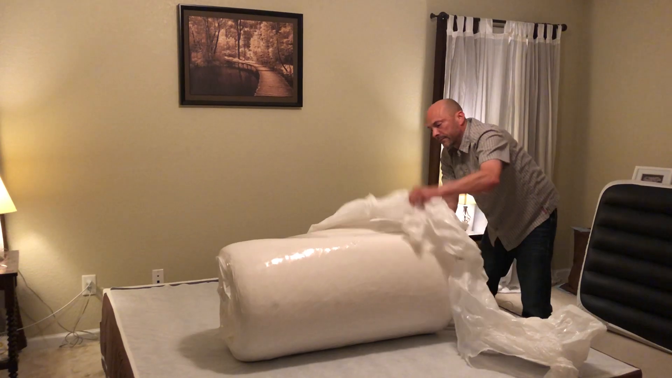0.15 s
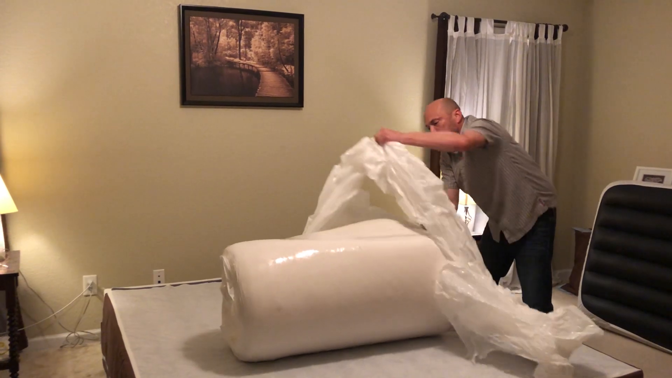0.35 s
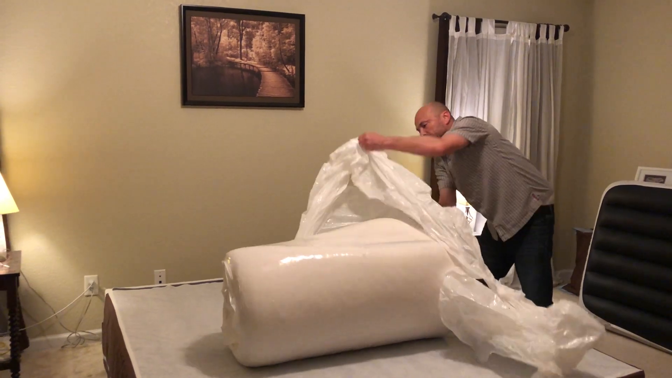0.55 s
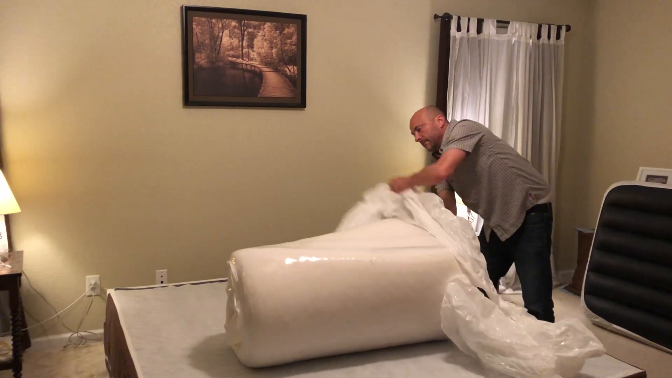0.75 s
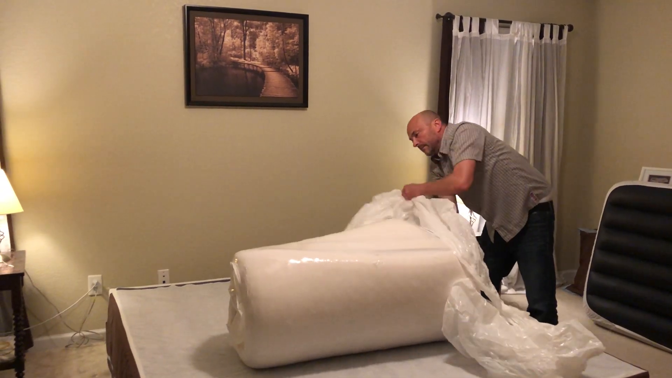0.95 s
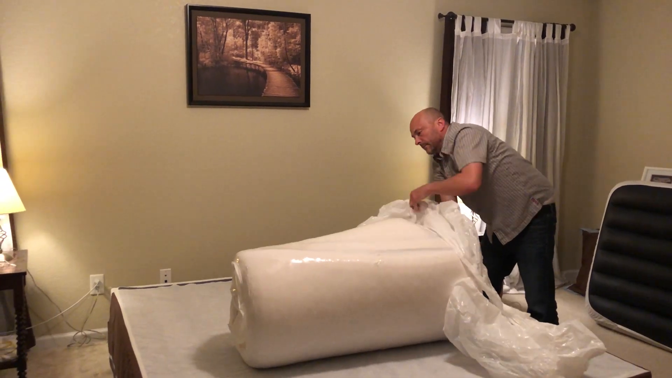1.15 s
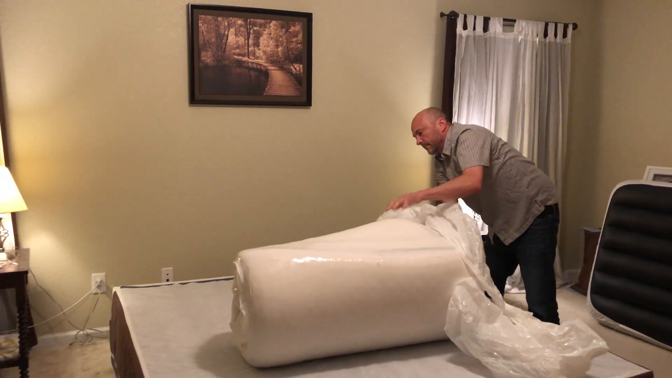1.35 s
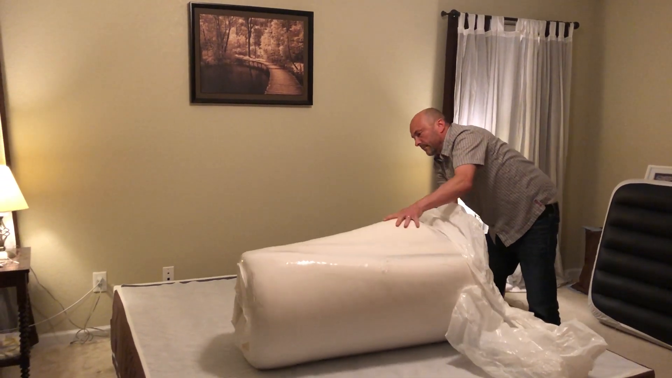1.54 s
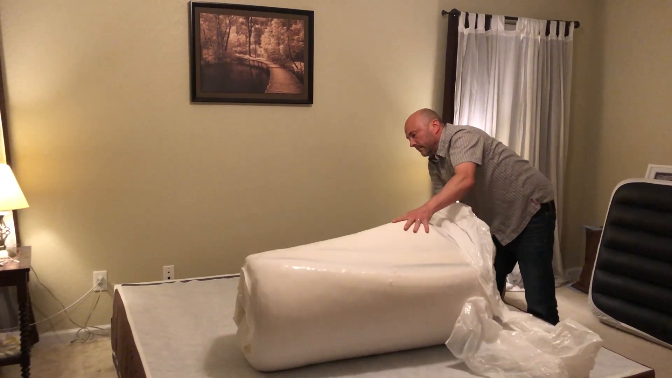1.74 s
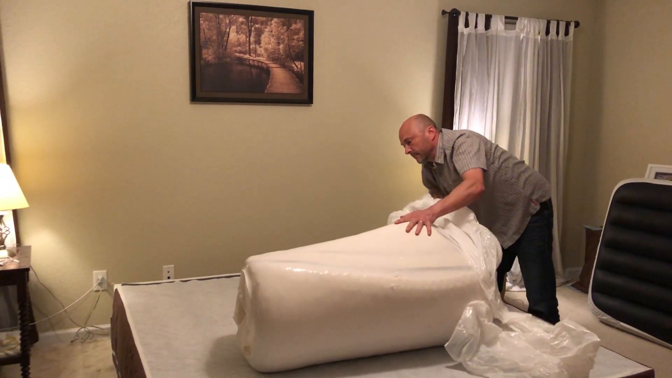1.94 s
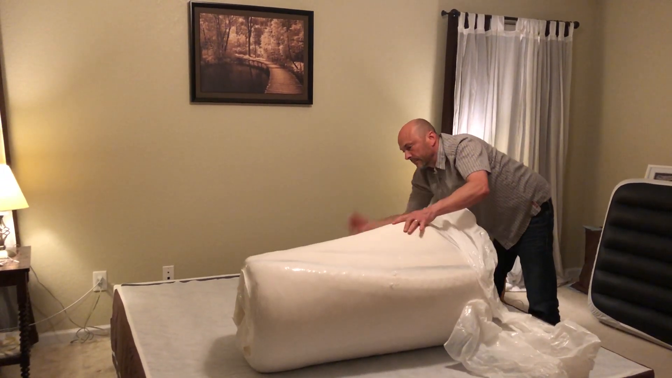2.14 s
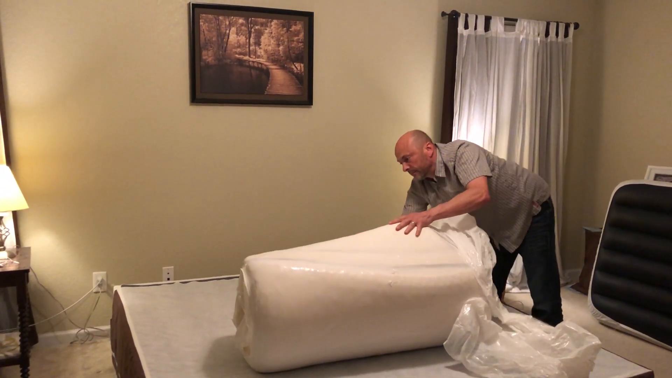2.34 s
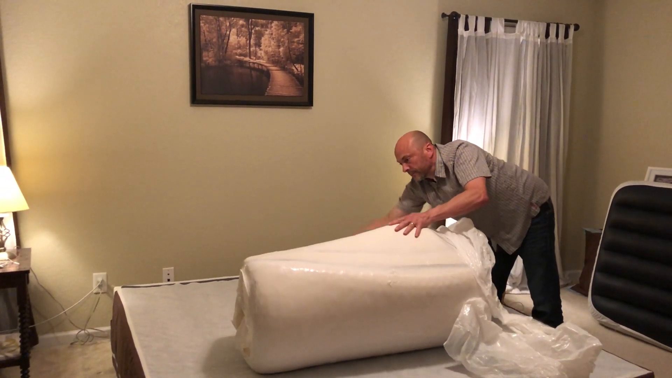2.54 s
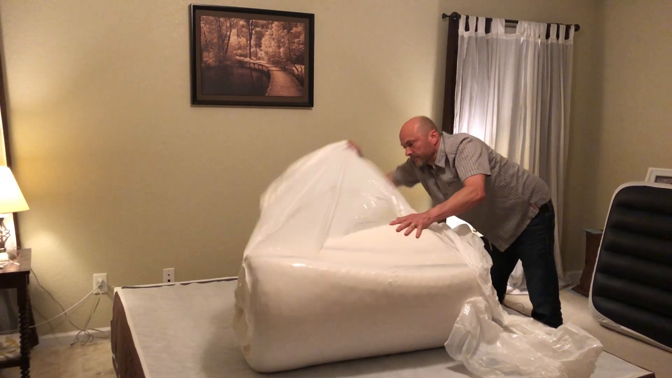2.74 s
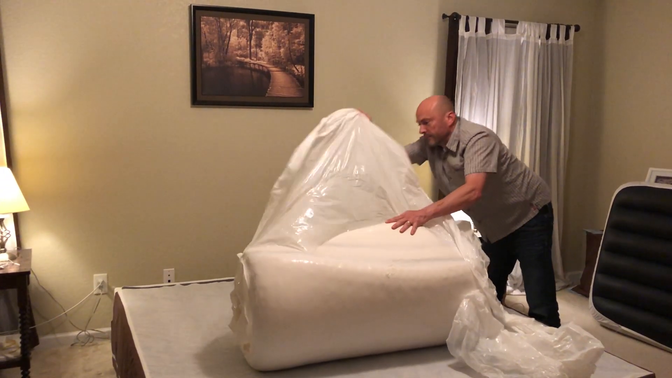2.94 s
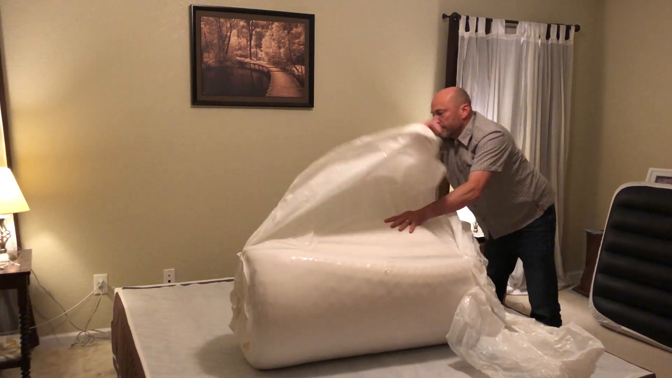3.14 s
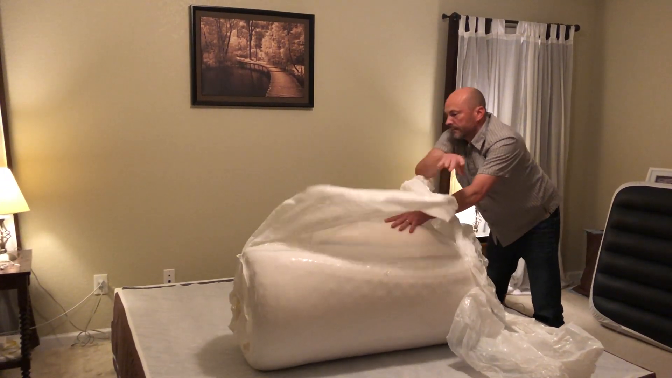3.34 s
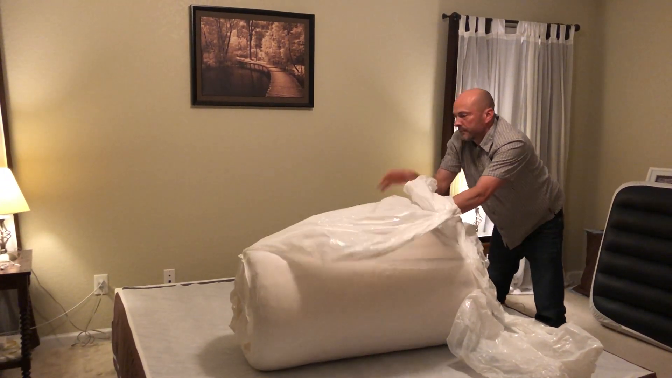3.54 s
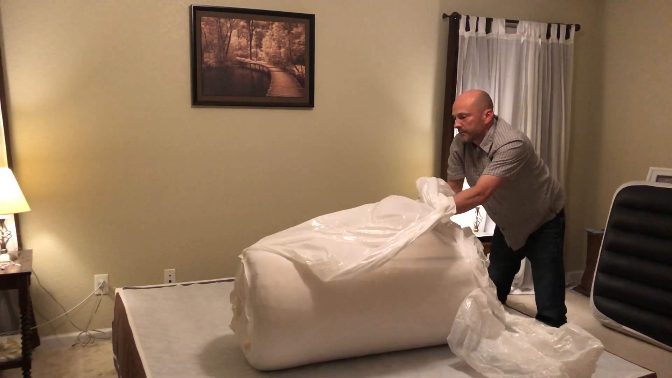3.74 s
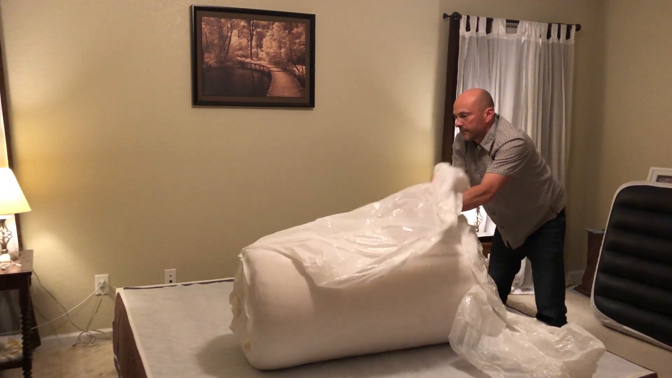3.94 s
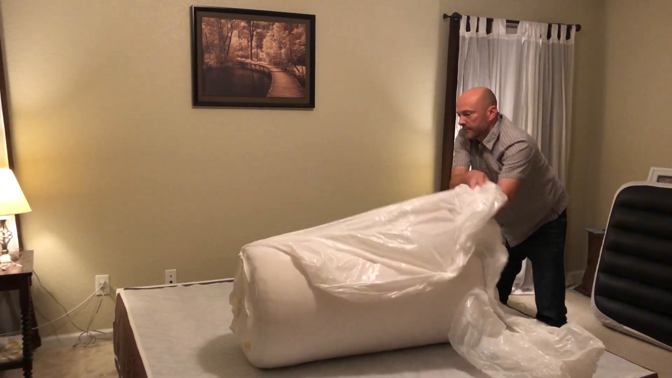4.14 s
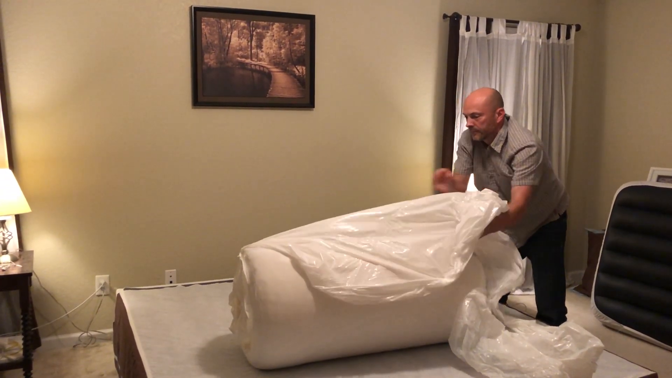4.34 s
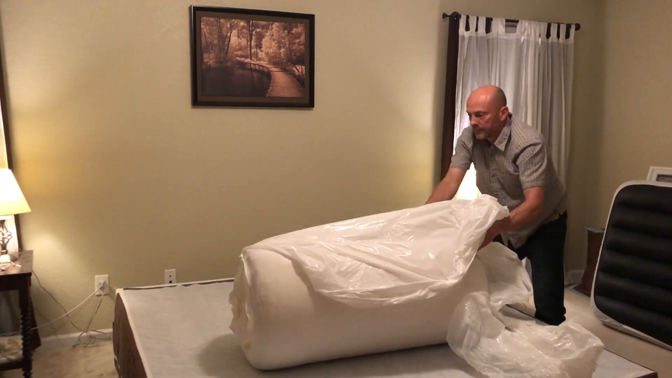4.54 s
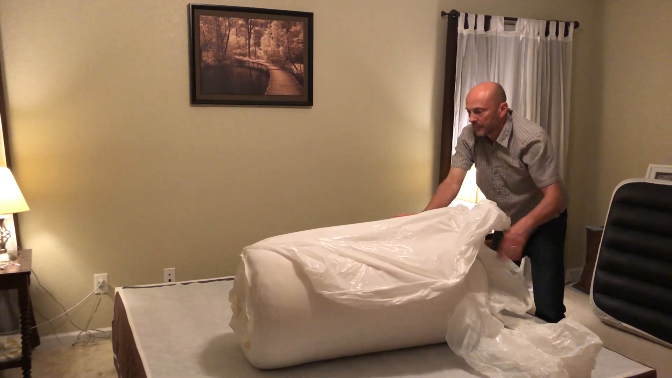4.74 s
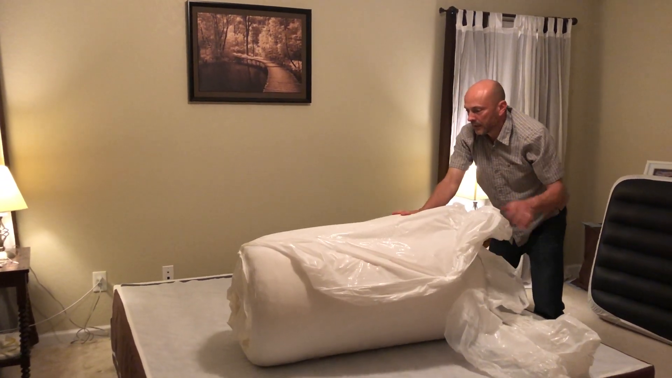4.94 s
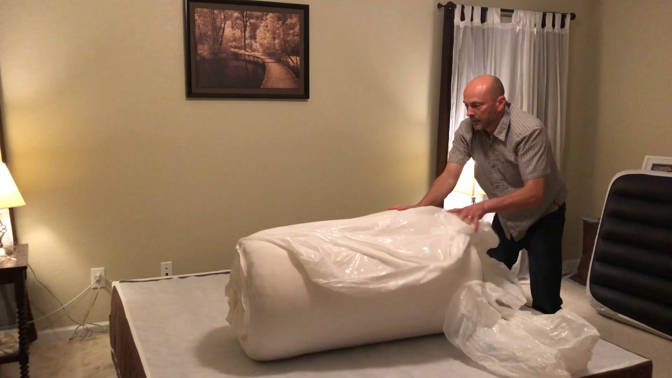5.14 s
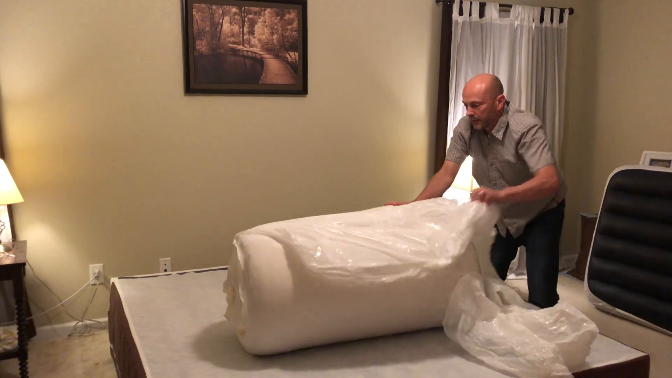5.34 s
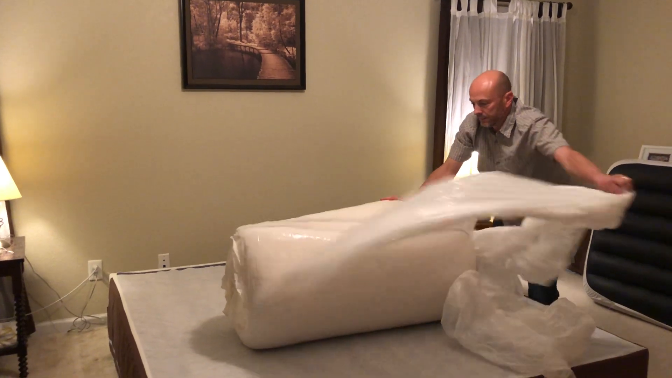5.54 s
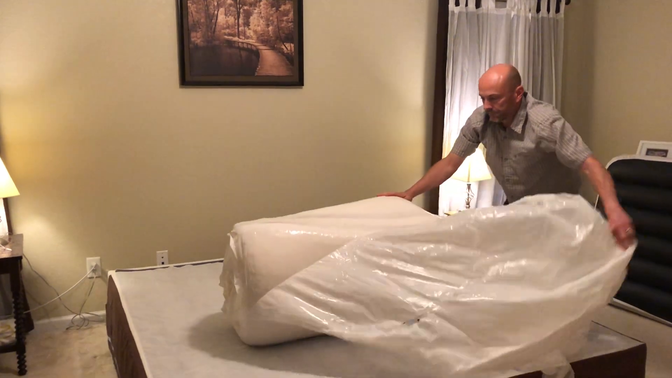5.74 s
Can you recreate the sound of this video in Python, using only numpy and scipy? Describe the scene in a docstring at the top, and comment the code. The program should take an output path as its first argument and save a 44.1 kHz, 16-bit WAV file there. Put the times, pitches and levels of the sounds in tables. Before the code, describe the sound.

A large sheet of thin plastic is pulled off a rolled mattress in a carpeted bedroom, heard by a mono phone a few metres away. Crisp, irregular crinkling starts at once, swelling around 0.3 s and again in tugs from 0.55 to 1.0 s with sharp snaps. From 1.2 to 2.5 s it drops to faint rustles and scattered dry ticks. A strong burst bursts out at 2.65 s, peaking at 2.8 s as the loudest, fullest crumple with a low thump of air, followed by hard snaps near 3.0 to 3.1 s. Small ticks continue to 3.9 s, then medium rustling from 4.0 to 4.3 s. A tiny rising rubbery squeak sounds at about 4.4 s. A duller fold follows at 4.7 s, then near-quiet, light rustle at 5.35 s and a sudden loud crackling sweep at 5.6 s, dying quickly. Faint throbbing hum and airy hiss lie underneath, with a short room tail.

```python
"""A carpeted bedroom: thin plastic sheeting is tugged off a rolled mattress a few metres from a mono phone.
Tugs drive clustered random pops, filtered into third octaves and pitched by crease size.
Lone creases snap as noise ticks over duller bodies; short resonant noise bursts are flaps and crumples.
A palm squeaks once on the film, as three partials of a rising slip rate.
The room adds a short noise tail, a throbbing hum and faint air noise."""
import sys
import numpy as np
from scipy import signal
from scipy.io import wavfile
from scipy.ndimage import uniform_filter1d

SR = 44100
rng = np.random.default_rng(int(sys.argv[2]) if len(sys.argv) > 2 else 0)


def master(y):
    """Save y as 16-bit WAV."""
    cut = np.clip(np.atleast_2d(y).T, -1, 1)
    pcm = np.round(cut * 32767)  # scale
    wavfile.write(sys.argv[1], SR, pcm.astype(np.int16))


N = 254891
TIME_S = np.arange(N) / SR
SLOW_S = np.arange(0, N + 32, 32) / SR  # coarse clock for levels


def undb(db):
    """dB to amplitude."""
    return 10 ** (np.asarray(db) / 20)


def unit(x):
    """Scale to rms 1."""
    return x / np.sqrt(np.mean(x ** 2))


def band(x, lo_hz, hi_hz, order=2):
    """Causal band-pass."""
    edges_hz = [lo_hz, min(hi_hz, .49 * SR)]
    return signal.sosfilt(signal.butter(order, edges_hz, "band", fs=SR, output="sos"), x)


def walk(rate_hz):
    """Random levels held 1 / rate_hz, smoothed twice, on the coarse clock; rms 1."""
    hold = max(int(1 / rate_hz / SLOW_S[1]), 1)
    steps = np.repeat(rng.standard_normal(len(SLOW_S)), hold)[:len(SLOW_S)]
    return unit(uniform_filter1d(uniform_filter1d(steps, hold), hold))


def to_audio(slow):
    """Coarse clock to sample rate."""
    return np.interp(TIME_S, SLOW_S, slow)


def on_log(hz, table):
    """Read a spectrum on a log-frequency axis."""
    table_hz, db = np.transpose(table)
    return np.interp(np.log(hz), np.log(table_hz), db)


def pops(per_s, spread_db):
    """Random buckling impulses of either sign, a few much larger than the rest; rms 1."""
    count = int(per_s * N / SR)
    when, sign, size = rng.random((count, 3)).T
    impulses = np.sign(sign - .5) * undb(-spread_db * np.log(1 - size))
    return unit(np.bincount((when * N).astype(int), impulses, N))


# Pitch per crease size, biggest folds to finest creases: (pitch [Hz])
CREASE_HZ = [200, 700, 1900, 5700, 12500]
# Colour of the crackle: (frequency [Hz], relative third-octave level [dB])
FILM_DB = [(30, -35), (60, -17), (160, -4), (290, 2.5), (520, -2), (1000, 2), (2200, 2), (2900, 0.5),
           (4200, 3), (8000, 4), (11000, 2.5), (15500, 0)]


def crackle():
    """Film buckling: each third octave mixes its own pops, shared broad pops and sparse bright ticks."""
    sizes_db = tugs()
    avalanche_db = 0.58 * walk(35) + 0.83 * walk(120)  # shared by all bands
    broad, bright, out = pops(3000, 3.2), pops(900, 2.2), 0
    for hz in 31 * 2 ** (np.arange(28) / 3):
        place = np.interp(np.log(hz), np.log(CREASE_HZ), np.arange(5))
        k = min(int(place), 3)
        pull_db = sizes_db[k] + (place - k) * (sizes_db[k + 1] - sizes_db[k])
        own = pops(min(.8 * hz, 6000), 1.99)  # small creases pop more often
        mix = own + 0.8 * broad + 0.74 * min(hz / 9000, 1) * bright
        grains = unit(band(mix, hz * 2 ** (-1 / 6), hz * 2 ** (1 / 6)))
        level_db = pull_db + on_log(hz, FILM_DB) + avalanche_db + 0.9 * walk(14)
        out = out + grains * to_audio(undb(level_db))
    return undb(-6.5) * out


# Each tug swells, holds and dies away: (start of hold [s], relative level [dB], swell [dB/s], hold [s],
# fade before FADE_SHARE [dB/s], fold extra before FOLD_SHARE [dB], small-crease extra before SMALL_SHARE [dB])
TUGS = [(.005, -48.5, 100, .03, 103, 7, -2.5), (0.056, -38.5, 600, .03, 80, 2.5, -2.5),
        (0.11, -39.5, 196, 0.045, 60, 2.5, -1), (0.311, -32.5, 165, .07, 106, -4, -1),
        (0.565, -38.5, 56, 0.021, 100, -0.5, 1.5), (0.687, -36, 62, 0.064, 102, -5.5, 3),
        (0.907, -34, 75, 0.02, 187, -2.5, -1), (1.02, -45.5, 100, 0.037, 40, -1.5, -1.5),
        (1.21, -45, 68, 0.12, 154, -0.5, 0.5), (1.51, -49.5, 78, 0.041, 40, 1, 0.5),
        (1.63, -50.5, 80, 0.037, 83, -2.5, -2.5), (1.71, -44.5, 300, 0.049, 60, 3, -2),
        (1.933, -49, 80, 0.038, 93, 1, -0.5), (2.067, -54.5, 80, 0.043, 200, -2, 2.5),
        (2.25, -56, 300, .05, 200, 2, -1), (2.38, -48.5, 82, .03, 60, -6, -4),
        (2.475, -47.5, 64, 0.067, 50, -1.5, -1.5), (2.648, -29.5, 352, 0.065, 100, 1.5, 1.5),
        (2.779, -22.5, 197, 0.038, 141, 4, 0.5), (3.009, -39, 105, 0.032, 116, 3, 1),
        (3.14, -42.5, 100, 0.053, 65, -0.5, 1.5), (3.252, -43, 150, .03, 60, -1.5, -1),
        (3.6, -53.5, 60, .05, 40, 0, 0), (3.764, -49.5, 86.5, .16, 50, -1, -2),
        (3.996, -38.5, 253, 0.044, 45, 5, -1.5), (4.114, -35.5, 63, 0.057, 150, -4.5, -3),
        (4.261, -37.5, 120, 0.024, 82, -0.5, 0), (4.577, -55, 150, 0.027, 200, -18, 7.5),
        (4.696, -41, 77, 0.042, 113, 12, -5), (4.933, -59, 41, 0.076, 30, 2.5, 2),
        (5.17, -53.5, 47, 0.046, 40, 2, -1), (5.35, -41.5, 66, 0.088, 30, 1, -1.5),
        (5.473, -45.5, 50, .03, 48, -12, 5), (5.573, -26, 185, 0.012, 121, -5.5, -1),
        (5.611, -26.5, 150, .015, 116, 3.5, 0)]
# Per crease size, biggest to finest: (relative level [dB])
CREASE_DB = [-10, -8, -0.5, -0.5, 0.5]
# Per crease size, how far it follows each tug extra: (factor [1])
FOLD_SHARE = [0.77, 0.66, 0, 0, 0.068]
SMALL_SHARE = [1.3, 0.047, 0, 1.1, 1.1]
# Small creases fall quiet sooner than big folds: (fade-rate factor [1])
FADE_SHARE = [.9, .95, 1.0, 1.05, 1.15]


def tugs():
    """Level of each crease size over time in dB; overlapping tugs add their power."""
    s, db, swell, hold_s, fade, fold_db, small_db = np.transpose(TUGS)[:, :, None]
    rise_db = swell * np.maximum(s - SLOW_S, 0)
    fall_db = fade * np.maximum(SLOW_S - s - hold_s, 0)
    levels_db = []
    for size_db, fold, small, quick in zip(CREASE_DB, FOLD_SHARE, SMALL_SHARE, FADE_SHARE):
        each_db = db - rise_db - quick * fall_db + fold * fold_db + small * small_db
        total = np.sqrt(np.sum(undb(each_db) ** 2, axis=0))
        levels_db.append(size_db + 20 * np.log10(total + 1e-9))
    return levels_db


# Lone creases: (time [s], tick peak [dB], body peak relative to tick [dB])
SNAPS = [(0.042, -31, -18), (0.0995, -23, -13), (0.6629, -25, -19), (0.718, -20, -25), (0.769, -19, -15),
         (1.284, -34, -3.5), (1.454, -35, -3), (1.509, -30.5, -8), (1.703, -28, -21), (1.848, -27, -26),
         (1.924, -34, -8), (2.099, -34, -28), (2.249, -35, -16), (2.3027, -34, -19), (2.374, -36, -0.5),
         (2.62, -28, -8), (2.6399, -26.5, 2.5), (2.777, -21, 6), (3.012, -19, -12), (3.035, -16.5, -29),
         (3.0969, -20.5, -9), (3.442, -33, -15), (3.4708, -32, -16), (3.5473, -36, -9), (3.593, -30, -23),
         (3.647, -33, -7), (3.7194, -36.5, -19), (3.97, -29, -16), (3.9782, -24, -9), (4.26, -24.5, -17),
         (4.4697, -34.5, -7), (4.5296, -32, -13), (4.557, -28, -19), (4.6278, -29, -16), (4.9721, -32, -28),
         (5.03, -38, -25), (5.112, -44, -18), (5.4316, -26.5, -11), (5.5356, -25, -3)]
SPLUTTER_S = 0.016  # decay time constant


def snaps():
    """Lone creases snap: a tick and a splutter of smaller ticks, with a duller body under it."""
    out, t = np.zeros(N + 2048), np.arange(2048) / SR
    for s, db, body_db in SNAPS:
        noise = rng.standard_normal((3, len(t)))
        fade = np.exp(-t / SPLUTTER_S) * np.minimum(t / 0.0021, 1)
        envelope = 0.5 * np.exp(-t / 0.00077) + 0.29 * np.abs(noise[2]) * fade
        tick = band(noise[0] * envelope, 3100, 11000, order=1)
        body = band(noise[1] * fade, 460, 2400)
        snap = tick / np.abs(tick).max() + undb(body_db) * body / np.abs(body).max()
        i = int(s * SR)
        out[i:i + len(t)] += undb(db) * snap
    return out[:N]


# Air pushed by a flap up to a stiff patch ringing as it folds:
# (time [s], centre [Hz], burst length [s], rms over twice that length [dB])
CRUMPLES = [(.045, 109, 0.03, -47), (0.574, 2190, 0.024, -43), (1.288, 700, 0.025, -55),
            (1.746, 1110, 0.054, -53), (2.755, 59.3, 0.07, -46), (2.777, 2560, 0.0071, -25),
            (3.033, 1480, 0.022, -39), (4.1, 245, 0.011, -44), (4.15, 2200, 0.041, -42.5),
            (4.244, 960, 0.034, -47), (4.635, 3020, 0.013, -44), (4.691, 1290, 0.035, -43.5),
            (4.669, 136, 0.11, -51), (5.33, 1700, .05, -50), (5.625, 153, 0.056, -46),
            (5.609, 694, 0.011, -29.5), (5.61, 60, 0.054, -61)]


def crumples():
    """Folding film: a noise burst through one broad resonance."""
    out = np.zeros(N + SR)
    for s, hz, length_s, db in CRUMPLES:
        i, n = int(s * SR), int(length_s * SR)
        noise = rng.standard_normal(SR // 4)[:n]
        burst = np.r_[noise * np.sqrt(np.hanning(n)), np.zeros(n)]  # room to ring
        out[i:i + 2 * n] += undb(db) * unit(band(burst, hz / 1.14, hz * 1.14))
    return out[:N]


# Partials of the squeak: (multiple of slip rate [1], relative level [dB])
SQUEAK_PARTIALS = [(1, -9), (2, 3), (3, -18)]
SQUEAK_START_S, SQUEAK_PEAK_S, SQUEAK_END_S = 4.325, 4.382, 4.485
SLIP_START_HZ, SLIP_END_HZ, SLIP_SETTLE_S = 1680, 2050, .038
SQUEAK_REL_DB, SQUEAK_SWELL_DB_S = -42.5, 88  # before partial levels
SQUEAK_DROP_DB, SQUEAK_DROP_S, SQUEAK_FADE_DB_S = 10, .015, 110


def squeak():
    """Skin slips on film at a rising, unsteady rate, its grain roughening the level; partial two leads."""
    since_s = np.maximum(SLOW_S - SQUEAK_START_S, 0)
    after_s = SLOW_S - SQUEAK_PEAK_S
    slip_hz = SLIP_END_HZ - (SLIP_END_HZ - SLIP_START_HZ) * np.exp(-since_s / SLIP_SETTLE_S)
    swell_db = SQUEAK_SWELL_DB_S * np.minimum(after_s, 0)
    drop_db = SQUEAK_DROP_DB * np.clip(after_s / SQUEAK_DROP_S, 0, 1)
    trail_db = SQUEAK_FADE_DB_S * np.maximum(after_s - SQUEAK_DROP_S, 0)
    level_db = SQUEAK_REL_DB + swell_db - drop_db - trail_db + 3.5 * walk(200)
    phase = 2 * np.pi * np.cumsum(to_audio(slip_hz * (1 + 0.0312 * walk(600)))) / SR
    edge_s = np.minimum(SLOW_S - SQUEAK_START_S, SQUEAK_END_S - SLOW_S)
    fade = np.clip(edge_s / 0.0055, 0, 1)
    tone = sum(undb(db) * np.sin(k * phase) for k, db in SQUEAK_PARTIALS)
    return np.sqrt(2) * tone * to_audio(fade * undb(level_db))


ROOM_T60_S, ROOM_DB = 0.25, -9  # tail energy relative to direct


def room(x):
    """Direct sound plus a diffuse, slightly dulled tail; echo pattern varies as across a wide sheet."""
    hop, t = 3072, np.arange(10240) / SR  # fresh pattern every 70 ms, crossfaded
    onset = np.clip(t / 0.0052 - .5, 0, 1)  # first walls answer after a few ms
    padded = np.r_[np.zeros(hop), x, np.zeros(hop)]
    wet = np.zeros(N + 4 * hop + len(t))
    for i in range(0, N + 1, hop):
        noise = rng.standard_normal(len(t))
        low = uniform_filter1d(noise, size=7)
        tail = onset * (low + 0.85 * (noise - low)) * undb(-60 * t / ROOM_T60_S)
        tail = tail / np.sqrt(np.sum(tail ** 2))
        piece = padded[i:i + 2 * hop]
        window = np.sqrt(np.hanning(2 * hop))[:len(piece)]
        echo = signal.fftconvolve(piece * window, tail)
        wet[i:i + len(echo)] += echo
    return x + undb(ROOM_DB) * wet[hop:hop + N]


# Air noise and faint film rustle: (frequency [Hz], half-octave level before flicker [dB])
AIR_DB = [(40, -93), (90, -74), (300, -68), (600, -67.5), (1500, -60.5), (4000, -58.5), (9000, -56),
          (15000, -59.5)]
HUM_HZ, HUM_WIDTH_HZ, HUM_DB = 124.4, 30, -63


def background():
    """Air noise, treble rustle flickering as the film settles, and narrow-band noise as a throbbing hum."""
    settle_walk, air = walk(12) + 0.28 * walk(40), 0
    for hz in 40 * 2 ** (np.arange(18) / 2):
        grains = unit(band(pops(min(hz, 8000), 2.6), hz * 2 ** (-1 / 4), hz * 2 ** (1 / 4)))
        flicker_db = 1.04 * min(hz / 3000, 1) * settle_walk
        air = air + grains * to_audio(undb(on_log(hz, AIR_DB) + flicker_db))
    hum = band(rng.standard_normal(N), HUM_HZ - HUM_WIDTH_HZ / 2, HUM_HZ + HUM_WIDTH_HZ / 2, order=1)
    return air + undb(HUM_DB) * unit(hum)


def scene():
    """One microphone feeds both channels."""
    film = crackle() + snaps() + crumples() + squeak()
    mono = room(film) + background()
    return np.array([mono, mono])


TOP_HZ = 15750


def record(dry):
    """The phone cuts the top steeply: elliptic low-pass."""
    return signal.sosfilt(signal.ellip(12, .2, 80, TOP_HZ, fs=SR, output="sos"), dry)


dry = scene()
out = record(dry)
master(out)
```